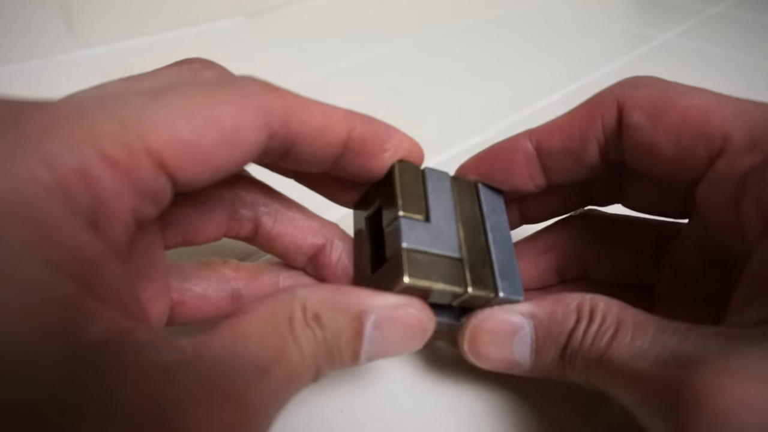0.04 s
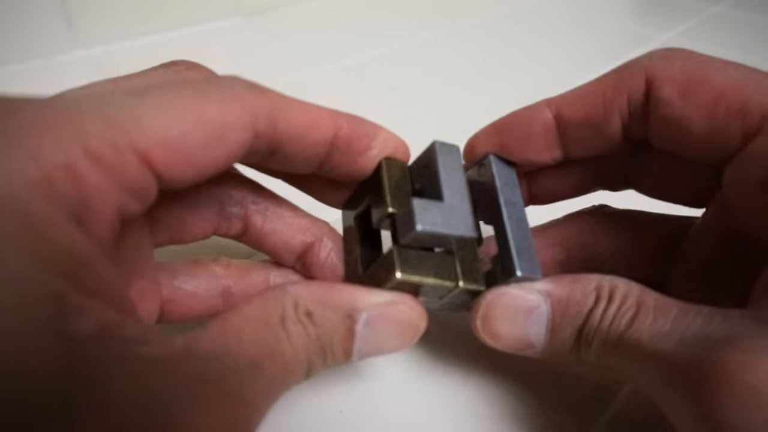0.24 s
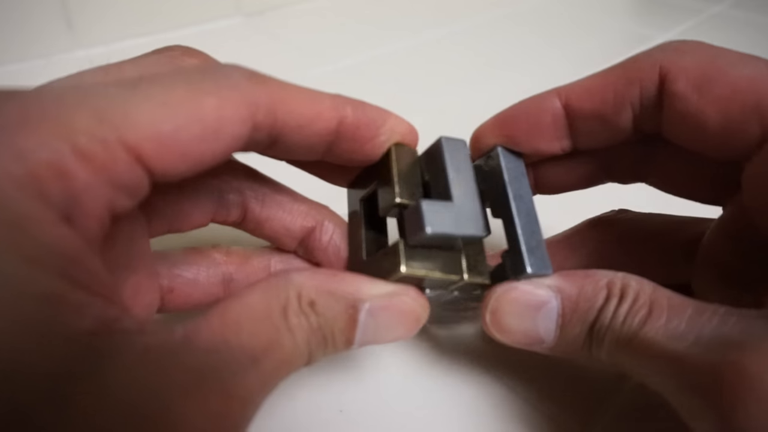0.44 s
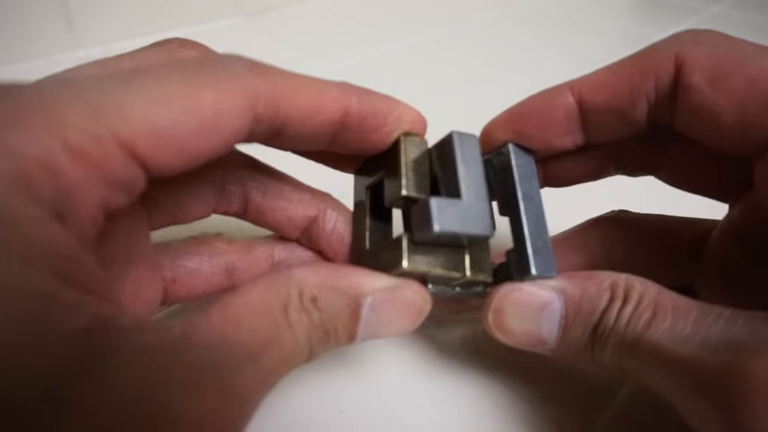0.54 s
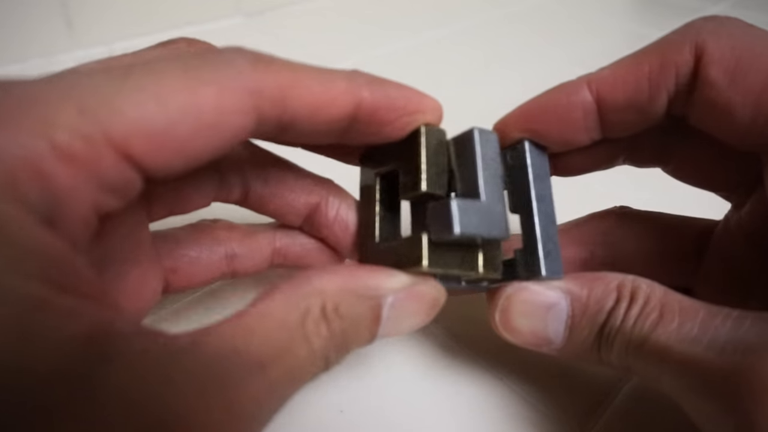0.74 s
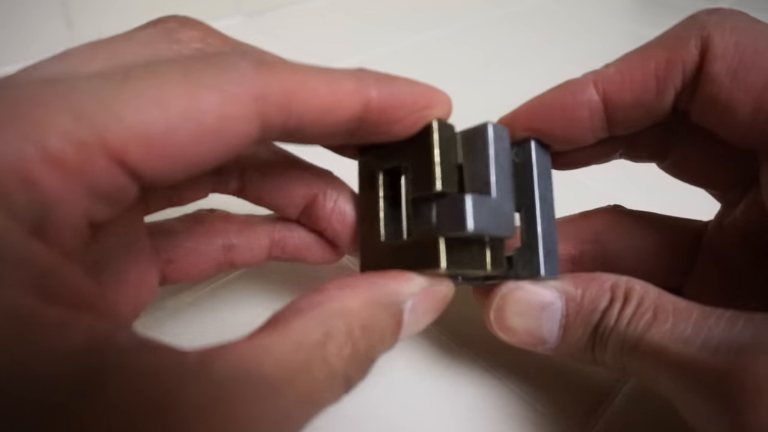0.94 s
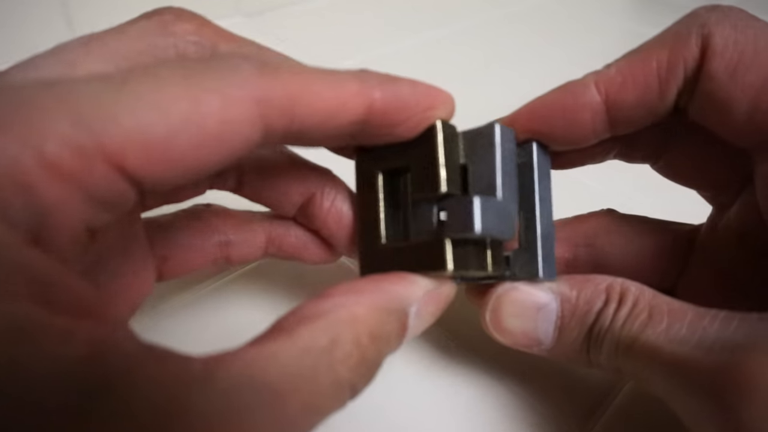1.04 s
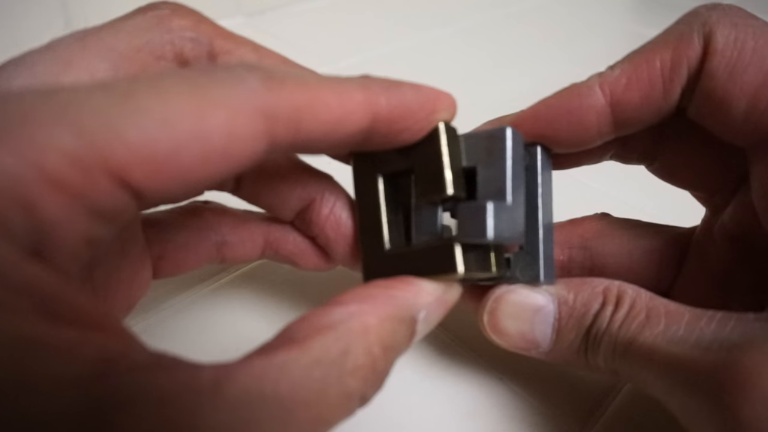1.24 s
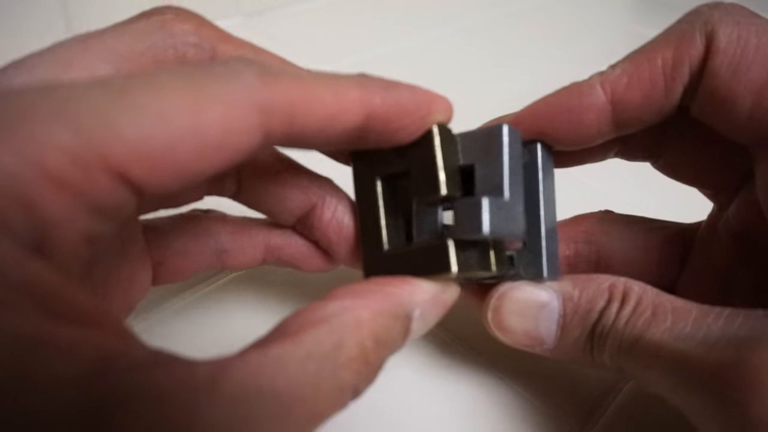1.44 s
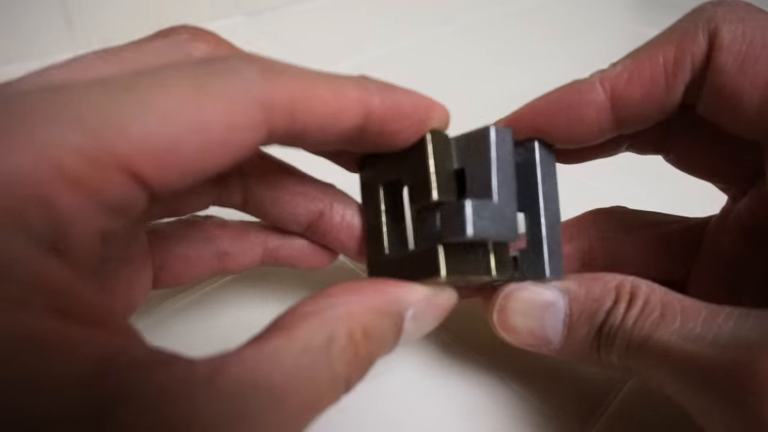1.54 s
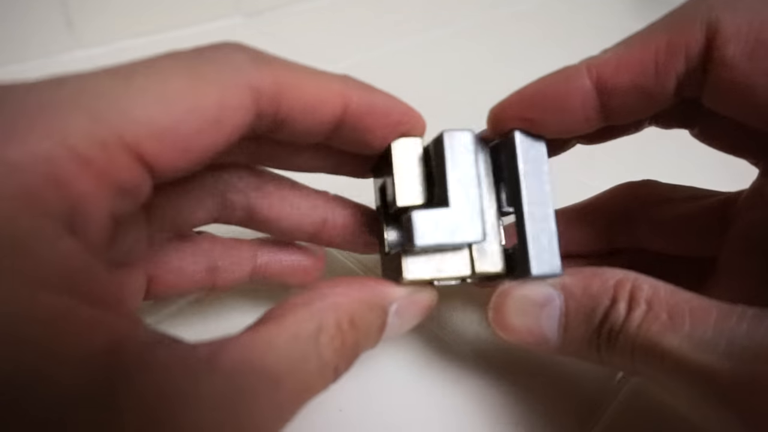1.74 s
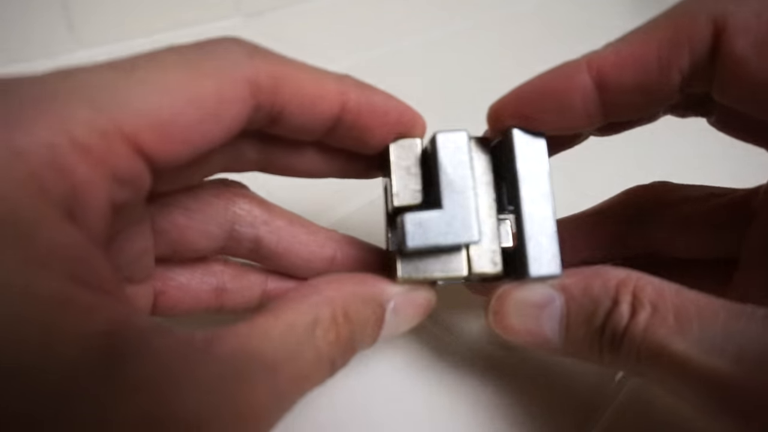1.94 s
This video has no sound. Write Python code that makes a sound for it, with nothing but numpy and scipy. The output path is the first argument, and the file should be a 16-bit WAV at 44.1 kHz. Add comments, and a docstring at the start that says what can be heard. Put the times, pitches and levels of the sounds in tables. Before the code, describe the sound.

A small metal puzzle clicks open close by at about 0.2 seconds, its pieces knocking together in a quick, bright chatter that leaves a short room echo. From about 0.85 seconds until 2 seconds, the pieces give faint, scattered ticks as they are turned. Ventilation hums quietly throughout in the small hard room.

```python
"""Ventilation hums quietly in a small hard room from start to end. At 0.2 seconds, hands close by pull
a small metal puzzle open: its pieces slip, knock against their stops and chatter. The fingers damp
the metal within milliseconds, so the bright tail that follows is the room's echo.
From about 0.85 seconds on, the pieces tick faintly as they are turned."""
import sys
import numpy as np
from scipy import signal
from scipy.fft import rfft, irfft
from scipy.io import wavfile
from scipy.ndimage import uniform_filter1d

SR = 44100
rng = np.random.default_rng(int(sys.argv[2]) if len(sys.argv) > 2 else 0)


def unload_audio(sound):
    """Save the sound as a 16-bit wav file, at the path given as the first command line argument."""
    columns = np.transpose(np.atleast_2d(sound))
    # keep every value between -1 and 1, then stretch to whole-number steps
    steps = np.round(np.clip(columns, -1, 1) * 32767)
    wavfile.write(sys.argv[1], SR, steps.astype(np.int16))


N = 88200  # two seconds
BIN_HZ = np.arange(N // 2 + 1) * SR / N
OPPOSITE = np.array([[1], [-1]])  # plus on the left, minus on the right


def gain(db):
    """Turn decibels into a multiplier."""
    return 10 ** (np.asarray(db) / 20)


def pan(db):
    """Left and right gains, the left louder by db."""
    return gain(OPPOSITE * db / 2)


def unit(x):
    """Scale to an average (rms) level of 1."""
    return x / np.sqrt(np.mean(x ** 2))


def curve(points):
    """Join (Hz, value) points into a curve over all frequencies."""
    hz, values = np.array(points, float).T
    return np.interp(np.log(BIN_HZ + 1), np.log(hz), values)


def colour(x, points):
    """Turn frequencies up or down along (Hz, dB) points."""
    return irfft(rfft(x) * gain(curve(points)), N)


def wander(rate):
    """A smooth random wobble that takes about `rate` steps a second."""
    hold = int(SR / rate)
    steps = np.repeat(rng.standard_normal(N // hold + 1), hold)
    return unit(uniform_filter1d(uniform_filter1d(steps, hold), hold)[:N])


# The tone of the rushing air. Each row: frequency in Hz, relative level in dB.
AIR_TONE = [(25, -47), (70, -32), (135, -20), (180, -7.5), (250, 2), (400, -4.5), (540, -7.5), (850, -11.5),
            (1250, -5.5), (1800, -20), (3300, -17), (4600, -23), (7000, -24.5), (11000, -29)]
# How alike the air is in both ears. Each row: frequency in Hz, likeness (1 means the same).
EAR_LIKENESS = [(30, .3), (130, 1), (300, .88), (600, .2), (1200, .2), (3000, .1), (10000, .05)]
# The notes of the hum. Each row: pitch in Hz, base level in dB.
HUM_NOTES = [(298, -71), (360.5, -77.5), (420, -82), (637, -82.5), (1249, -83.5), (3095, -86.5),
             (3634, -93)]
# How the hum swells and sinks. Each row: time in seconds, level added in dB.
HUM_SWELL = [(0, 3), (.45, -7.5), (.65, 2), (.85, -3.5), (1.1, -1), (1.33, 4), (1.48, -1.5), (1.8, 3),
             (2, -6)]


def ventilation():
    """Moving air makes a soft rush, with a few wavering notes humming in it."""
    shared, apart = rfft(rng.standard_normal((2, N)))
    alike = curve(EAR_LIKENESS)
    air = irfft(shared * np.sqrt(1 + alike) + OPPOSITE * apart * np.sqrt(1 - alike), N)
    air = unit(colour(air, AIR_TONE)) * gain(-64.5 + .6 * wander(5.8))
    hum = np.zeros(N)
    waver_db, drift_hz = 3, 2.5
    for hz, db in HUM_NOTES:
        waver = gain(waver_db * wander(8.7))
        phase = 2 * np.pi * np.cumsum(hz + drift_hz * wander(16)) / SR
        hum += gain(db) * unit(waver * np.sin(phase))
    swell_db = np.interp(np.arange(N) / SR, *np.array(HUM_SWELL).T)
    left, right = air + hum * gain(swell_db)
    late_left = np.roll(left, int(.00012 * SR))
    return pan(-1.04) * np.array([late_left, right])


def fade(t, fade_s):
    """Start at t = 0 and die away by 60 dB every fade_s seconds."""
    return (t >= 0) * np.exp(-np.log(1000) * np.maximum(t, 0) / fade_s)


# Metal meeting metal. Each row: start in seconds, level in dB, the pitch that the struck spot
# favours in Hz, boost near that pitch in dB, treble change in dB.
KNOCKS = [(0.196, -44, 4100, 5, -6), (0.2002, -23, 4560, 7, -4), (0.2007, -40, 2500, 10, -11),
          (0.206, -33, 5700, 8, -1), (0.2122, -29.5, 4200, -1, -3), (0.222, -25.5, 4200, 2, 1.5),
          (.2232, -27, 4450, 9.5, -2), (0.2235, -26, 4440, 3, 9.5), (0.2262, -35.5, 8400, 9, 6.5),
          (.2286, -32.5, 5380, 12.5, 4), (0.2305, -33, 3120, 6.5, 8.5), (0.2314, -35, 5650, 19, 6),
          (.2327, -31, 5330, 12, -7.5), (.2676, -36.5, 5080, 9.5, -12.5), (0.2694, -42.5, 3100, 6.5, -1),
          (0.3233, -50.5, 3150, 6.5, -10.5), (0.8517, -58.5, 3120, 7.5, -9), (1.0278, -57, 3190, 6.5, -9),
          (1.0320, -57.5, 5100, 2.5, -13), (1.4905, -61.5, 3080, 12.5, -6), (1.4935, -64.5, 4300, 8, -8),
          (1.5634, -53, 4940, 8.5, -6.5), (1.5632, -58, 2800, 23, -16), (1.7280, -57.5, 4980, 9.5, 4),
          (1.7712, -55, 4750, 16, 2), (1.966, -57, 4280, 12.5, 5)]
# The notes that the held pieces ring with. Each row: pitch in Hz, level in dB,
# seconds to fade by 60 dB, left minus right in dB.
METAL_NOTES = [(2480, -15, 0.011, 1.5), (2850, -18, 0.013, 4), (3112, -10, 0.017, -8),
               (4066, -12.5, 0.0075, -6), (4340, -6.5, 0.0091, -3), (4527, -6.5, 0.012, -3),
               (4983, -7, 0.015, -2.5), (5230, -11, 0.013, 3.5), (5730, -16.5, 0.00795, -1),
               (6550, -17.5, 0.0079, -10), (7650, -19.5, 0.0073, -3), (8330, -12, .011, -1),
               (9120, -14.5, 0.014, -3), (9710, -15, .011, -3.5), (10800, -21.5, .007, -11.5)]
# Small pieces give off little bass. Each row: frequency in Hz, level change in dB.
RING_TONE = [(500, -16), (1800, -4.5), (2500, 3.5)]
# The tone of a knock's noisy crack. Each row: frequency in Hz, level change in dB.
CRACK_TONE = [(100, -26), (600, -20), (1100, -11.5), (1900, -15), (2600, -6), (4600, 4), (6800, -8.5),
              (9000, -1), (11000, -11)]


def puzzle():
    """Each knock cracks and briefly rings the metal, most at the notes that the struck spot favours."""
    rings, cracks = np.zeros((2, 2, N + SR))
    t = np.arange(SR // 10) / SR
    hz, note_db, fade_s, pan_db = np.array(METAL_NOTES, float).T
    treble = 1 / (1 + (7000 / hz) ** 8)  # near 1 for notes well above 7000 Hz
    rise_s, ear_lag_s, favour_octaves, scatter_db = .0003, .00002, .075, 1.4
    rise = 1 - np.exp(-(t / rise_s) ** 2)
    for start, level_db, favoured_hz, boost_db, treble_db in KNOCKS:
        scatter, spread = rng.standard_normal((2, len(hz)))
        favour = np.exp(-.5 * (np.log2(hz / favoured_hz) / favour_octaves) ** 2)
        strength = gain(note_db + boost_db * favour + treble_db * treble + scatter_db * scatter)
        phase_gap = .29 * spread + 2 * np.pi * hz * ear_lag_s  # the ears are slightly out of step
        ring = np.zeros((2, len(t)))
        for k in range(len(hz)):
            note = np.sin(2 * np.pi * hz[k] * t + OPPOSITE * phase_gap[k] / 2)
            ring += strength[k] * pan(pan_db[k]) * fade(t, fade_s[k]) * note
        crack = rng.standard_normal((2, len(t))) * fade(t, fade_s=.011)
        i = int(start * SR)
        rings[:, i:i + len(t)] += gain(level_db) * ring * rise
        cracks[:, i:i + len(t)] += gain(level_db + treble_db / 2) * crack
    return colour(rings[:, :N], RING_TONE) + gain(-3) * pan(-6.5) * colour(cracks[:, :N], CRACK_TONE)


# The tone of the echoes. Each row: frequency in Hz, relative level in dB.
ECHO_TONE = [(500, -1.5), (2000, 3), (3100, -3.5), (4000, -4.5), (4550, -0.5), (5400, -2.5), (6500, 1.5),
             (8500, 2.5), (11000, -1.5)]


def echoes(sound, fade_s, delay_s):
    """Hard surfaces throw back a blur of dying echoes, different in each ear."""
    noise = colour(rng.standard_normal((2, N)), ECHO_TONE)
    tail = unit(noise * fade(np.arange(N) / SR - delay_s, fade_s)) / np.sqrt(N)
    mono = sound.mean(axis=0, keepdims=True)
    return signal.fftconvolve(mono, tail, axes=1)[:, :N]


def scene():
    """Over the ventilation, the puzzle clicks and echoes off the hands, table and walls."""
    background = ventilation()
    clicks = puzzle()
    hands_and_table = gain(-6) * echoes(clicks, fade_s=.041, delay_s=.0015)
    walls = gain(-7) * pan(-2.5) * echoes(clicks, fade_s=.41, delay_s=.0048)
    return background + clicks + hands_and_table + walls


def record(dry):
    """Cut the treble steeply above 11150 Hz."""
    return signal.sosfilt(signal.ellip(10, .2, 70, 11150, fs=SR, output="sos"), dry)


dry = scene()
out = record(dry)
unload_audio(out)
```